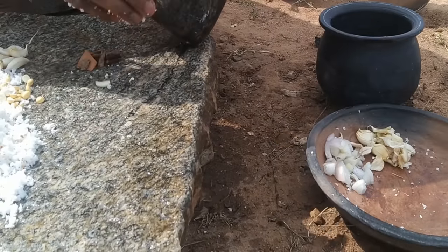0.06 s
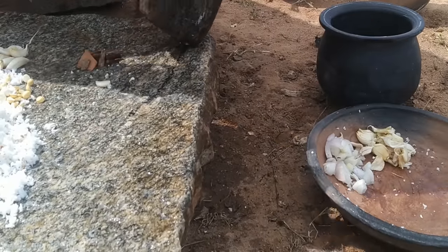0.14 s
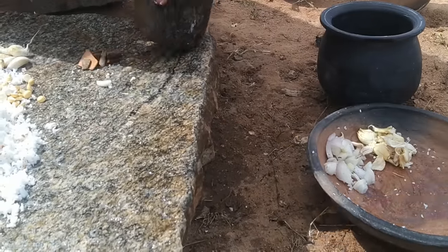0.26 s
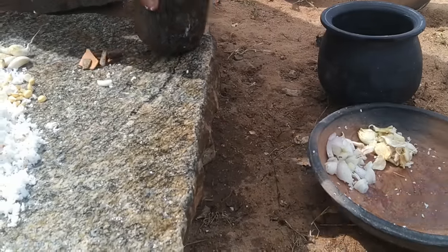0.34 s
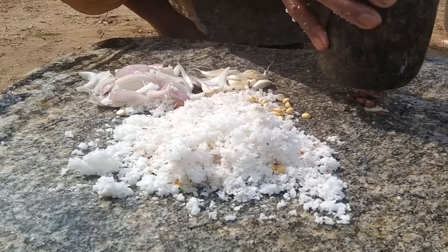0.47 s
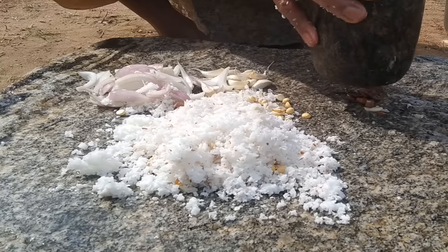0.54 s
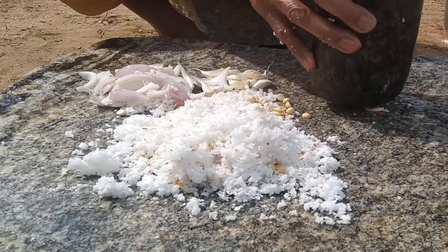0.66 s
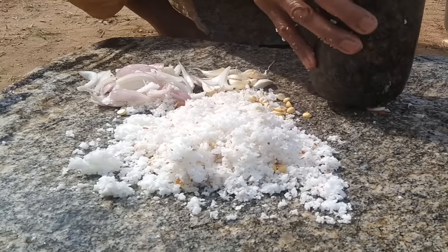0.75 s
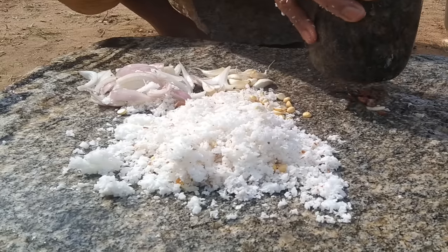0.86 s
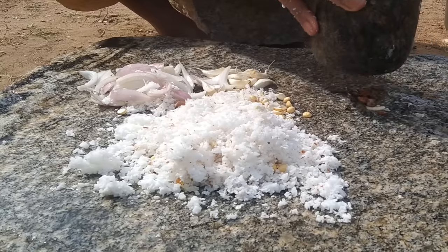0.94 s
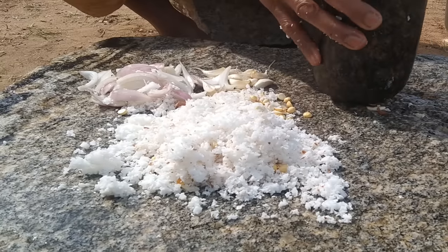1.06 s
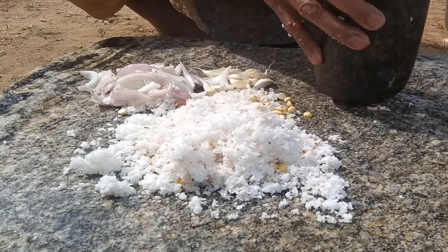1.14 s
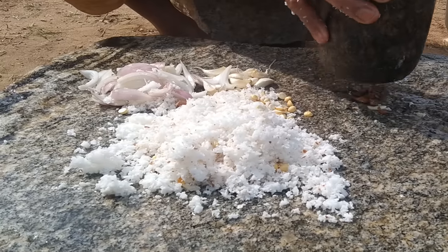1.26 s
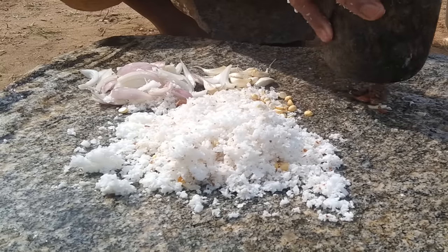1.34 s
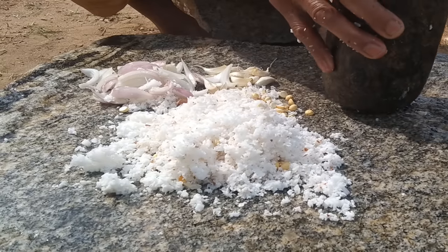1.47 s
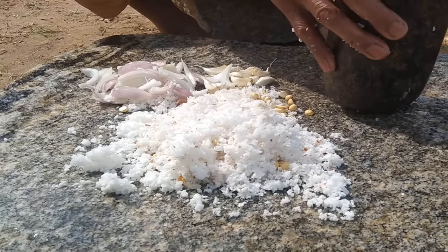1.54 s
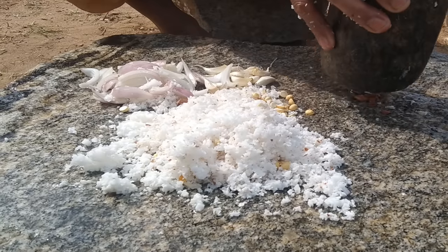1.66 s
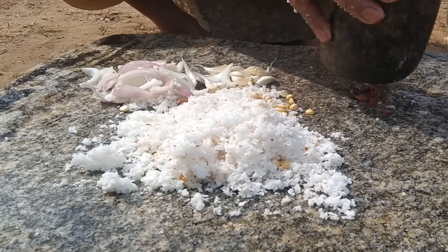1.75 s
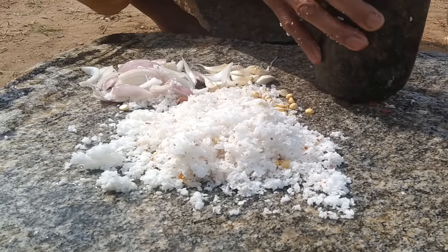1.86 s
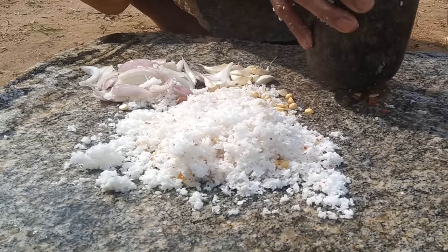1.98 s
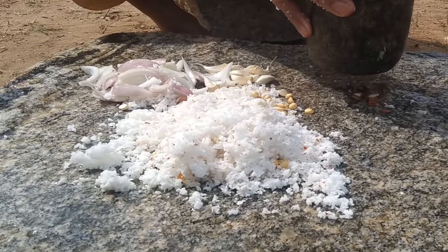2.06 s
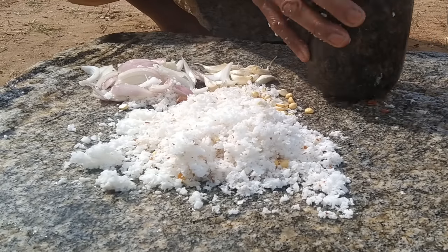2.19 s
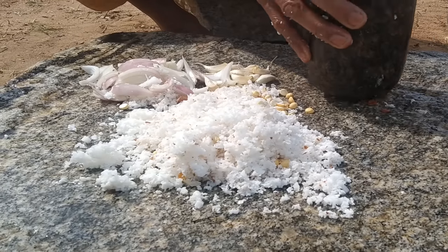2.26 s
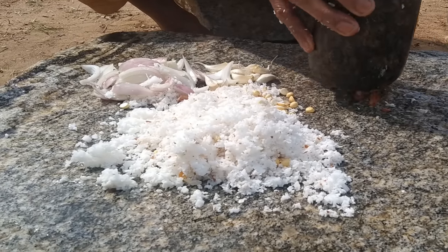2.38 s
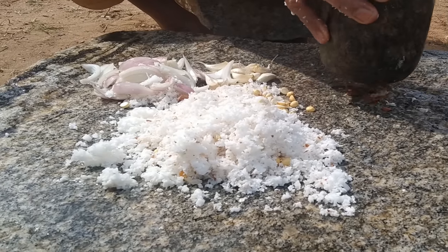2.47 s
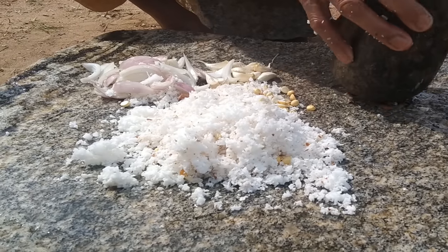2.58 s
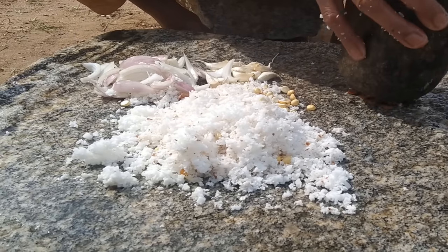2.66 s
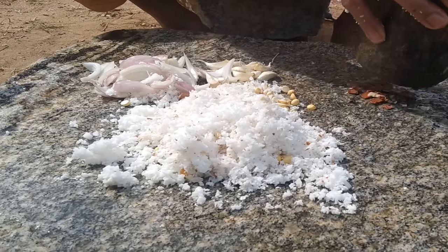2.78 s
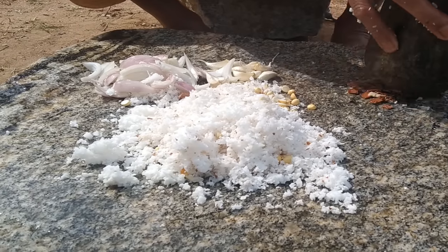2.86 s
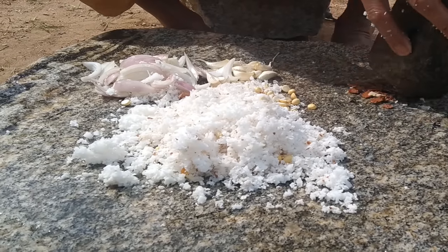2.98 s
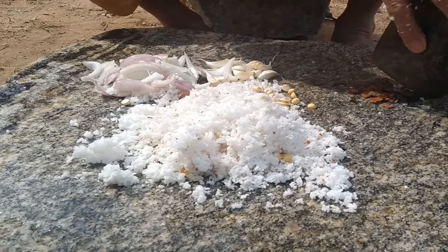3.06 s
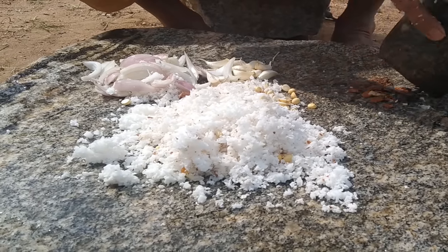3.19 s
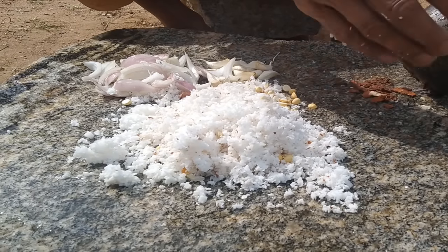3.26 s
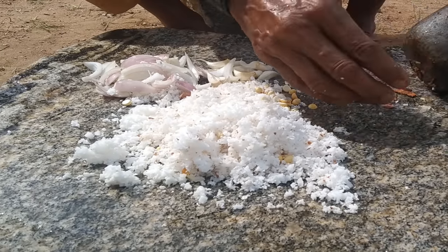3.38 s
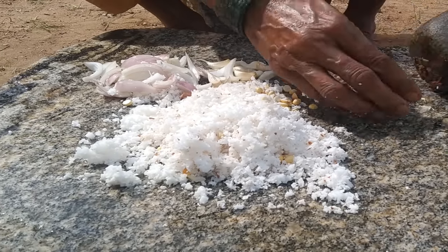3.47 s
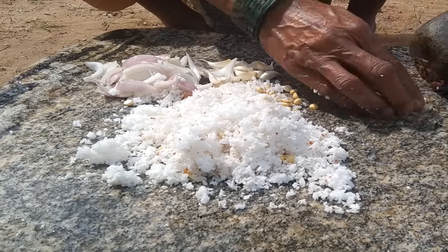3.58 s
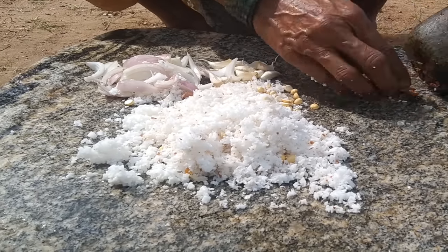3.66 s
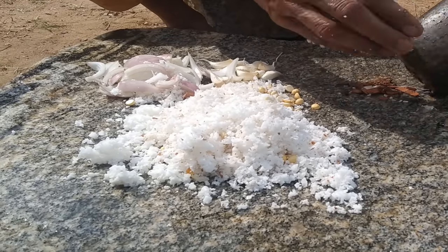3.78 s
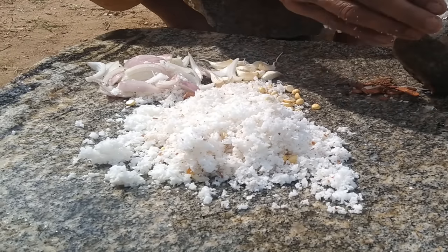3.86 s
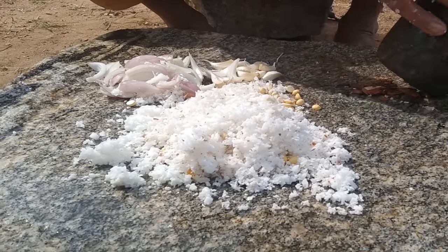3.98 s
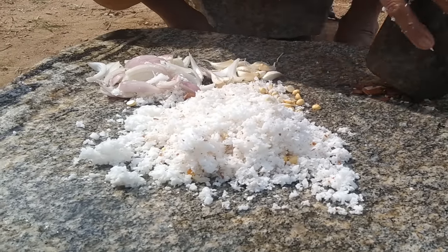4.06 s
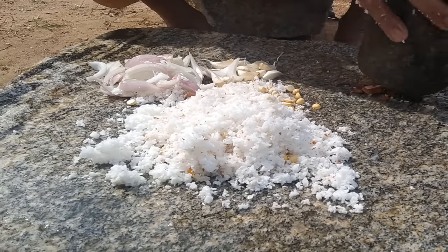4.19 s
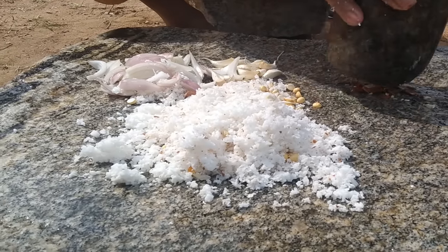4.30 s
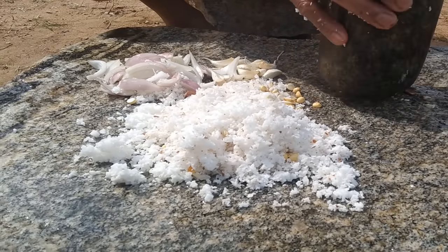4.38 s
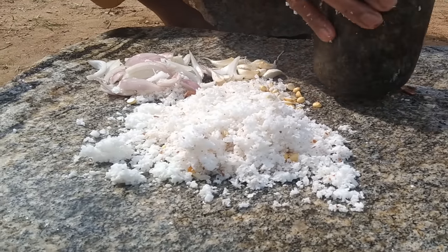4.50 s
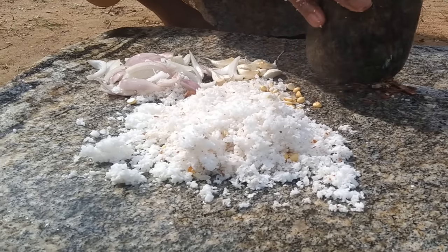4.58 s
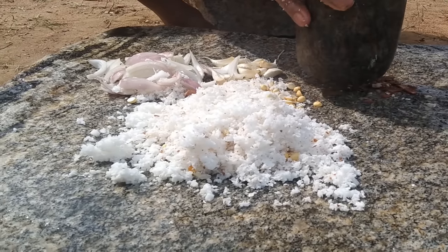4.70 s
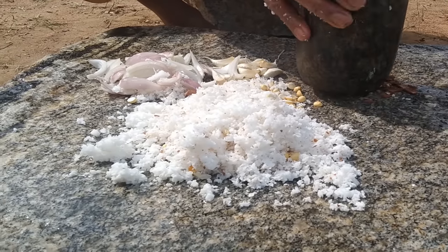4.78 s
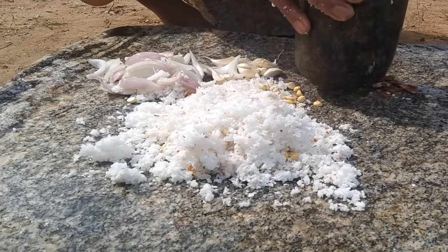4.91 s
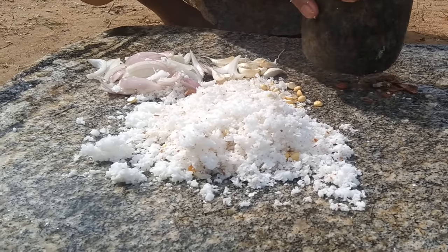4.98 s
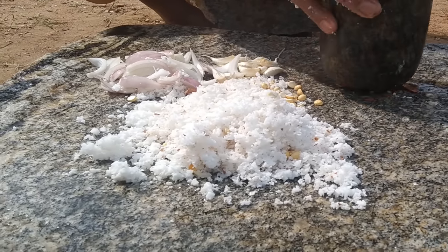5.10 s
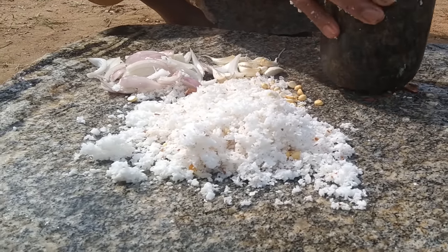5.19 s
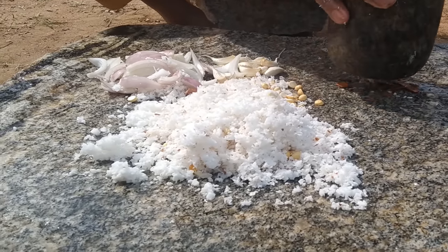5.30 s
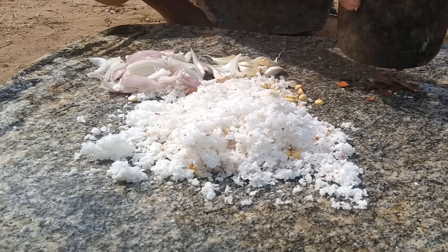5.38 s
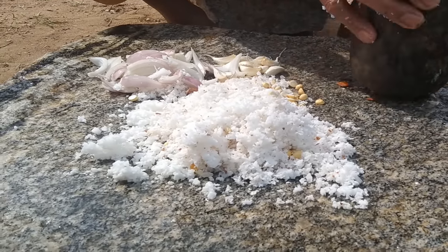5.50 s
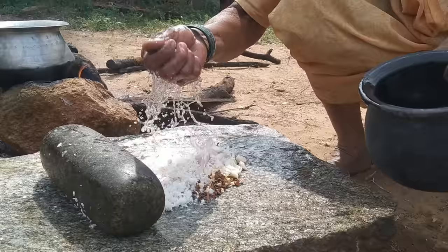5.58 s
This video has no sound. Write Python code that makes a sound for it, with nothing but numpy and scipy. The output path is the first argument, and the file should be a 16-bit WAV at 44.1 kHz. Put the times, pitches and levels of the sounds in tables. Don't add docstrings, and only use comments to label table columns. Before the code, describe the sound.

Close, heavy stone thuds and crunches on granite in two runs, split by a sharp clack and soft scraping, amid birdsong.

```python
import sys
import numpy as np
from scipy import signal
from scipy.fft import rfft, irfft
from scipy.io import wavfile
from scipy.ndimage import uniform_filter1d, map_coordinates

SR = 44100
rng = np.random.default_rng(int(sys.argv[2]) if len(sys.argv) > 2 else 0)


def natural_amplitude(level_db):
    exponent = np.asarray(level_db, float) / 20
    return 10 ** exponent


def store_pcm(level_fs):
    pcm = np.round(np.clip(level_fs, -1, 1) * 32767).astype(np.int16)
    wavfile.write(sys.argv[1], SR, np.atleast_2d(pcm).T)


N = 249058
T = np.arange(N) / SR

# start_s, thud_peak_db, thud_hz, upper_modes_db
PESTLE_BLOWS = [
    (0.6847, -17, 339, -4.5),
    (1.0744, -12.5, 374, -3.5),
    (1.4754, -15, 380, -12.5),
    (1.8667, -15, 373.5, -3),
    (2.23, -14.5, 377, -4.5),
    (2.5896, -18, 378.5, -7),
    (4.4166, -21, 341.5, -2.5),
    (4.7983, -17, 362, -1.5),
    (5.181, -28, 420, 1.5),
    (5.5548, -15.5, 370, 0),
]
# start_s, peak_db, lower_grit_db, top_grit_db
SPICE_CRUNCHES = [(0.6829, -23.5, -2, -32.5), (1.074, -29.5, -3.5, -40.5), (1.475, -26.5, -9, -31),
                  (1.8649, -22, -15.5, -29), (2.2288, -24, -1.5, -24.5), (2.589, -33, -5, -25),
                  (4.413, -23, -12, -35), (4.7948, -23, -10.5, -31.5), (5.1779, -33, -6.5, -30),
                  (5.555, -29.5, -10, -38.5)]


def unit(x):
    return x / np.sqrt(np.mean(x ** 2))


def band(x, lo_hz, hi_hz, order=2):
    sos = signal.butter(order, [lo_hz, min(hi_hz, .45 * SR)], "band", fs=SR, output="sos")
    return signal.sosfilt(sos, x)


def coloured(points, source):
    hz, db = np.transpose(points)
    f_hz = np.maximum(np.fft.rfftfreq(N, 1 / SR), 1)
    gain = natural_amplitude(np.interp(np.log(f_hz), np.log(hz), db))
    return irfft(rfft(source) * gain, N)


def walk(rate_hz):
    k = int(SR / rate_hz)
    smooth = uniform_filter1d(rng.standard_normal(N), k)
    return unit(uniform_filter1d(smooth, k))


def add(out, start_s, x):
    i = min(max(int(start_s * SR), 0), N)
    out[i:i + len(x)] += x[:N - i]


def ring(modes, contact_s, peak_db, sag=0., settle_s=1.):
    sag_s = .005
    t = np.arange(3000) / SR
    eased = t + sag * sag_s * (1 - np.exp(-t / sag_s))
    x = np.zeros(len(t))
    for k, (hz, db, t60_s) in enumerate(modes):
        x += (-1) ** k * natural_amplitude(db) * np.sin(2 * np.pi * hz * eased) * 1000. ** (-t / t60_s)
    x = x * (0.22 + 0.74 / (1 + (t / settle_s) ** 6))
    push = np.hanning(int(contact_s * SR) + 3)
    x = np.convolve(x, push)[:len(t)]
    return x * natural_amplitude(peak_db) / np.abs(x).max()


def burst(lo_hz, hi_hz, rise_s, fall_s, rms_db):
    t = np.arange(3000) / SR
    shape = (1 - np.exp(-t / rise_s)) ** 2 * np.exp(-t / fall_s)
    spray = unit(shape * band(rng.laplace(size=len(t)), lo_hz, hi_hz, order=3))
    return natural_amplitude(rms_db) * spray * np.sqrt(np.mean(shape ** 2)) / shape.max()


def knock(hz, upper_db, peak_db, contact_s, slower=1., upper_slower=1., sag=0., settle_s=1.,
          vary=.03, dull_db=0., own=()):
    # multiple_of_thud_hz, level_db, t60_s
    slab_modes = [(1, 2, 0.057), (.62, -9.5, 0.056), (1.35, -17.5, .03), (1.7, -12.5, 0.04)]
    # freq_hz, level_db, t60_s
    stone_modes = [(814, -1.5, 0.03), (996, 1.5, 0.041), (1330, -2.5, 0.04), (1810, -8, 0.039),
                   (2203, -13, 0.0054)]
    spread = rng.standard_normal((2, len(stone_modes)))
    low = [(hz * m, db, t60_s * slower) for m, db, t60_s in slab_modes]
    high = []
    for (f_hz, db, t60_s), a, b in zip(stone_modes, *spread):
        mode_db = db + upper_db - dull_db * np.log2(f_hz / 800) + 1.8 * b
        high.append((f_hz * (1 + vary * a), mode_db, t60_s * upper_slower))
    return ring(low + high + list(own), contact_s, peak_db, sag, settle_s)


def crunches():
    out = np.zeros(N)
    for s, db, lower_db, top_db in SPICE_CRUNCHES:
        add(out, s - .001, burst(5150, 7600, 0.0035, 0.0016, db - 10.0))
        add(out, s - .001, burst(2500, 6000, 0.00069, 0.0018, db + lower_db - 3.0))
        add(out, s - .001, burst(9000, 15000, .003, .0014, db + top_db + 1))
        add(out, s + 0.011, burst(4000, 7200, 0.014, 0.05, db - 41.5))
        add(out, s + 0.027, burst(11000, 12100, 0.0037, 0.0075, db - 46))
    add(out, 4.185, burst(11000, 12200, .012, .012, -74))
    return out


def blows():
    out, ground = np.zeros((2, N))
    for s, db, hz, upper_db in PESTLE_BLOWS:
        add(out, s, ring([(0.578 * hz, 0, .04)], 0.0015, db - 12.0))
        add(out, s - .001, ring([(1.27 * hz, 0, .02), (2.54 * hz, upper_db + 3, .01)], 0.00094, db - 9))
        add(out, s + 0.00196, -knock(0.889 * hz, upper_db, db + 3.5, 0.0005, slower=1.67, upper_slower=0.47,
                                     sag=0.34, settle_s=0.01))
        add(out, s + .007, ring([(.58 * hz, 0, .055), (.74 * hz, -5, .03)], .002, db - 7.5))
        add(out, s + .011, burst(179, 725, 0.00087, 0.0086, db - 15))
        add(out, s + .012, burst(620, 1500, 0.002, 0.0053, db + upper_db / 2 - 20.5))
        add(ground, s + 0.0022, burst(87, 276, 0.002, 0.017, .4 * db - 35.5))
    return out, ground


def bare_blow():
    # freq_hz, level_db, t60_s
    bare_modes = [(1017, 3.5, 0.011), (376, -8.5, 0.035), (835, -8, 0.0061), (637, -3, 0.016),
                  (2142, -13, 0.025), (1394, -8, 0.018), (2480, -13, 0.012), (3700, -12, 0.0099),
                  (202, -20, 0.07), (1700, -13, .016), (540, -11, .03)]
    start_s, peak_db = 2.9428, 3.5
    out, ground = np.zeros((2, N))
    add(out, start_s, ring(bare_modes, .0002, peak_db))
    add(out, start_s + .002, ring(bare_modes, .0004, peak_db - 5))
    add(out, start_s, burst(3800, 11000, .0002, .002, peak_db - 46.5))
    add(out, start_s + 0.0041, burst(250, 926, 0.002, .006, peak_db - 24.5))
    add(ground, start_s + 0.0046, burst(60, 230, 0.0027, 0.01, peak_db - 46.5))
    return out, ground


def rebounds():
    # start_s, peak_db, ring_hz, upper_modes_db
    landings = [(0.694, -25, 570, 4), (0.7005, -29, 540, -3), (1.097, -26.5, 840, -2),
                (1.487, -27.5, 593, -1.5), (1.887, -28.5, 760, -9.5), (2.249, -27.5, 800, -8),
                (2.255, -31, 800, -6), (2.61, -38, 507, -8), (2.9667, -23, 690, -6), (2.995, -36, 710, 1.5),
                (3.222, -45, 596, 14), (3.342, -43, 600, -5), (4.4305, -29.5, 600, -5.5),
                (4.424, -34, 620, 1), (4.819, -31, 754, -7), (5.1962, -31.5, 660, 3), (5.191, -32, 560, -6),
                (5.204, -42, 600, -8), (5.568, -27.5, 720, -3), (1.088, -29.5, 645, -0.5),
                (1.497, -34.5, 704, -2), (2.24, -32, 650, 0), (2.601, -36, 600, -1), (4.809, -30.5, 700, 2),
                (1.878, -30, 575, 1), (5.58, -37.5, 600, -5.5)]
    out = np.zeros(N)
    for s, db, hz, upper_db in landings:
        own = [(hz, 2.5, .04), (1360, upper_db / 2 - 6, .025)]
        add(out, s, knock(.6 * hz, upper_db - 5.0, db + 7.0, 0.00051, slower=0.75, upper_slower=0.57,
                          vary=.08, dull_db=7.0, own=own))
    return out


def taps_and_echoes():
    # start_s, peak_db,
    # thud_hz, upper_modes_db
    soft_taps = [(0.015, -38, 286, -13), (0.102, -40, 345, -11), (0.229, -36.5, 364, -2),
                 (0.349, -26, 325, -9.5), (0.431, -38.5, 462, -10), (0.6834, -29, 340, -4),
                 (3.016, -38.5, 357, 6), (3.126, -41, 368, 3), (3.154, -41, 347, -16),
                 (3.201, -42, 366, -4), (3.219, -31.5, 384, 0), (3.234, -39, 304, -8),
                 (3.312, -43, 310, -11), (3.351, -31.5, 368, 0), (3.362, -33.5, 346, -7.5),
                 (3.645, -49.5, 438, 3.5), (3.835, -39.5, 353, -9.5), (4.027, -45, 329, -7),
                 (4.4099, -26.5, 340, -5.5), (4.157, -44.5, 371, -26), (3.67, -47, 335, -4),
                 (4.997, -48, 437, 5.5), (4.7931, -31, 520, 0), (5.177, -36, 450, 0.5),
                 (2.586, -37, 598, -2), (2.2277, -36, 496, 0), (5.216, -43.5, 270, -15),
                 (2.268, -44, 300, -12), (1.122, -44, 280, -12), (2.979, -36, 340, -12),
                 (5.33, -52, 290, -15), (5.44, -52, 290, -5)]
    # lag_s, level_db
    wall_echoes = [
        (.075, -30),
        (.094, -38),
    ]
    echoed = [(s + lag_s, db + echo_db, hz, 2 * upper_db - 3)
              for s, db, hz, upper_db in PESTLE_BLOWS for lag_s, echo_db in wall_echoes]
    out = np.zeros(N)
    for s, db, hz, upper_db in soft_taps + echoed:
        thud = ring([(hz, 0, .065), (2.45 * hz, upper_db + 4, .03)], 0.0014, db + 2.5)
        add(out, s, band(thud, 210, 1500))
    return out


def ticks():
    # start_s, peak_db, freq_hz
    loose_ticks = [(0.571, -47, 1700), (0.7068, -42, 3910), (0.889, -56, 4050), (1.268, -51, 2300),
                   (1.096, -53, 1860), (1.7449, -40.5, 2960), (3.22, -45, 2030), (3.6026, -48.5, 6390),
                   (3.6984, -39.5, 2370), (4.0023, -46, 2318), (4.9973, -40, 3000)]
    out = np.zeros(N)
    for s, db, hz in loose_ticks + [(s - .001, db - 12, 1700) for s, db, _, _ in SPICE_CRUNCHES]:
        add(out, s, burst(0.47 * hz, 1.21 * hz, 0.0005, 0.002, db - 3.5))
    return out


def pestle():
    blow, blow_ground = blows()
    bare, bare_ground = bare_blow()
    stone = crunches() + blow + rebounds() + taps_and_echoes() + ticks() + bare
    return band(stone, 178, 15500, order=3) + blow_ground + bare_ground


def drag():
    # freq_hz, db_per_hz
    rumble_spectrum = [(100, -34), (200, -20.5), (270, -0.5), (350, 3), (480, -1.5), (750, -8),
                       (1100, -35.5)]
    rasp_spectrum = [(500, -19), (900, -2), (1250, 1), (1620, 8), (1950, 3.5), (2300, 5), (2800, -9.5),
                     (3600, -58)]
    hiss_spectrum = [(2000, -16), (3000, 4.5), (5000, -0.5), (7000, 4), (7900, -9), (8600, -36),
                     (10500, -45), (12000, -67)]
    # start_s, length_s, rasp_db, weight_db, fine_grit_db
    firm_strokes = [
        (0, 0.52, -45.5, -3.5, -7),
        (.575, 0.13, -57, -7, -14),
        (2.862, 0.062, -63.5, -0.5, -16),
        (2.99, 0.08, -48, 0.5, -33.5),
        (3.07, 0.4, -65, 1, -9),
    ]
    # start_s, length_s, rasp_db, weight_db, fine_grit_db
    light_strokes = [(.74, .13, -56, -6, -20), (1.93, 0.14, -60, -6, -18), (3.26, 0.16, -64, 12.5, -28),
                     (3.55, 0.28, -66.5, 1, 2), (3.85, 0.3, -62.5, -2.5, -13),
                     (4.18, .26, -60.5, -3.5, -11)]
    edge_s, lift_share = 0.002, .5
    slips = rng.standard_normal(N) * natural_amplitude(2.1 * rng.exponential(size=N))
    rumble = natural_amplitude(2 * walk(50)) * unit(coloured(rumble_spectrum, slips))
    rasp = natural_amplitude(1.66 * walk(70)) * unit(coloured(rasp_spectrum, slips))
    grit = unit(coloured(hiss_spectrum, slips))
    first_stroke = T < firm_strokes[0][1]
    out = natural_amplitude(-53.5) * unit(band(slips, 91, 304)) * first_stroke
    for rows, firm in (firm_strokes, True), (light_strokes, False):
        for s, length_s, db, weight_db, fine_db in rows:
            attack = (T - s) / (edge_s if firm else length_s / 2)
            release = (s + length_s - T) / (lift_share * length_s if s else edge_s)
            stroke = np.clip(np.minimum(attack, release), 0, 1)
            out += stroke * natural_amplitude(db) * (natural_amplitude(weight_db) * rumble + rasp + natural_amplitude(fine_db) * grit)
    dust = natural_amplitude(-90) * unit(band(slips, 12000, 15400, order=4)) * first_stroke
    return band(out, 40, 8700, order=4) + dust


def sing(song):
    syllables = {"fall": [(0, 1, -6), (.45, .66, 0), (1, 0, -4)], "sag": [(0, 1, -4), (.32, .37, 0),
                 (1, 0, -13)], "rise": [(0, 0, -10), (.55, .75, 0), (1, .99, -5)], "hook": [(0, .38, -8),
                 (.17, .5, 1), (.36, .8, -1), (.52, 1, -7), (.7, .85, -1), (1, 0, -6)],
                 "slide": [(0, 0, -5), (.5, .5, 0), (1, 1, -5)], "vee": [(0, .7, 0), (.45, 0, -3),
                 (1, 1, -6)], "warble": [(0, 0, -10), (.12, .45, -1), (.36, .2, -3), (.52, .55, 0),
                 (.7, .97, -5), (1, .5, -9)], "plunge": [(0, 1, -5), (.25, .42, -2), (.55, .24, -2),
                 (1, 0, -7)]}
    notes = []
    for name, rows in song.items():
        for s, length_s, a_hz, b_hz, db in rows:
            notes.append([(s + u * length_s, a_hz + v * (b_hz - a_hz), db + rel_db)
                          for u, v, rel_db in syllables[name]])
    return notes


def whistles(notes, flutter_db):
    out = np.zeros(N)
    flutter = np.tile(natural_amplitude(flutter_db * walk(69)), 2)
    waver = np.tile(1 + .006 * walk(45), 2)
    for note in notes:
        s, hz, db = np.transpose(note)
        t = np.arange(max(s[0] - .006, 0), s[-1] + .006, 1 / SR)
        i = int(t[0] * SR)
        pitch_hz = map_coordinates(hz, [np.interp(t, s, np.arange(len(s)))], order=2, mode="nearest")
        pitch_hz = pitch_hz * waver[i:][:len(t)]
        gain = uniform_filter1d(np.interp(t, s, natural_amplitude(db), 0, 0), int(.009 * SR), mode="constant")
        gain *= flutter[i:][:len(t)]
        add(out, t[0], gain * np.sin(2 * np.pi * np.cumsum(pitch_hz) / SR))
    return out


def trees(x, t60_s, onset_s, lumpy_db, ragged_db):
    t = np.arange(SR // 2) / SR
    clumps = np.repeat(rng.standard_normal(len(t) // 200 + 1), 200)[:len(t)]
    envelope = 1000. ** (-t / t60_s) * (1 - np.exp(-t / onset_s)) * natural_amplitude(lumpy_db * clumps)
    tail = rng.standard_normal((2, len(t))) * envelope
    tail = tail / np.sqrt((tail ** 2).sum(1, keepdims=True))
    foliage = np.transpose([np.geomspace(2000, 8000, num=30), ragged_db * rng.standard_normal(30)])
    return signal.fftconvolve(coloured(foliage, x)[None], tail, axes=1)[:, :N]


def birds():
    near_song = {"fall": [(0, 0.097, 4470, 6470, -54), (.195, .1, 4400, 6210, -47.5),
                 (.405, 0.11, 4470, 6370, -44.5)], "vee": [(2.14, 0.072, 2480, 1895, -59.5)],
                 "sag": [(2.535, .115, 2498, 3654, -56.5)]}
    ahead_song = {"rise": [(1.68, .03, 4850, 5050, -72), (2.97, 0.055, 3800, 5000, -64),
                  (3.235, 0.063, 3640, 4690, -63), (2.82, .048, 3650, 4550, -70),
                  (3.385, 0.057, 3730, 4900, -63), (4.105, 0.04, 3100, 3680, -68.5),
                  (4.29, .05, 2850, 3700, -71.5), (4.49, 0.065, 2950, 3500, -67),
                  (4.93, .045, 4500, 5070, -70), (5.25, 0.045, 3020, 3400, -67)],
                  "fall": [(4.8, 0.027, 2800, 3200, -70), (3.76, 0.039, 3600, 3850, -66.5)],
                  "slide": [(3.105, 0.053, 3850, 5500, -66), (1.81, .023, 3800, 5100, -74),
                  (1.835, .015, 5100, 4500, -75), (2.7, .02, 4900, 4200, -73),
                  (4.905, .03, 3700, 4300, -68), (4.715, .03, 3950, 4000, -68),
                  (2.735, .055, 3150, 4050, -72), (2.4, 0.051, 3550, 4650, -73),
                  (2.665, 0.027, 3150, 3300, -69.5), (3.145, .02, 3400, 3720, -71),
                  (4.08, 0.017, 3300, 2600, -73), (4.56, 0.013, 4000, 3400, -63),
                  (5.09, 0.04, 3650, 3200, -66), (5.13, .04, 3400, 3500, -67),
                  (5.585, 0.026, 3750, 4300, -72), (5.595, 0.059, 2980, 3000, -60.5)],
                  "vee": [(3.55, 0.08, 3630, 2900, -70), (3.89, .07, 3020, 3800, -69),
                  (4.655, 0.065, 3680, 3980, -62), (4.86, 0.056, 3590, 3800, -62.5),
                  (5.56, 0.041, 2750, 3030, -58), (2.44, .075, 3020, 3497, -72)]}
    far_song = {"fall": [(3.955, 0.027, 3850, 6870, -61)], "hook": [(4.08, 0.1, 3843, 6050, -57),
                (4.29, 0.11, 3700, 5860, -54), (4.5, 0.11, 3330, 5880, -52),
                (4.71, 0.11, 3410, 5510, -50.5)], "warble": [(4.925, .15, 2950, 4610, -52.5),
                (5.16, .15, 3090, 4490, -55)], "plunge": [(5.38, .09, 2884, 6050, -53.5)]}
    # time_s, pitch_hz, level_db
    arched_calls = [
        [(0.6, 4407, -64), (0.622, 4560, -50), (0.636, 4736, -42.5), (0.656, 6347, -52), (0.666, 6074, -47),
         (0.68, 4264, -41), (0.686, 3974, -44), (0.698, 3858, -45), (0.705, 3796, -60)],
        [(0.785, 4279, -58), (0.795, 4457, -47), (0.811, 4504, -41), (0.825, 4819, -34), (0.839, 5950, -45.5),
         (0.847, 6150, -43), (0.853, 6038, -43), (0.875, 4044, -40), (0.9, 4034, -63)],
        [(0.96, 3170, -75), (0.978, 3339, -53), (0.996, 3798, -37.5), (1.008, 3945, -34.5), (1.032, 4700, -46),
         (1.05, 4688, -44.5), (1.07, 3881, -38), (1.096, 2975, -49), (1.105, 2919, -64)],
        [(1.17, 3077, -68), (1.176, 3187, -55), (1.204, 3658, -41), (1.232, 4502, -50), (1.244, 4485, -53.5),
         (1.274, 3826, -41.5), (1.284, 3436, -51), (1.292, 3118, -44), (1.3, 2912, -56)],
        [(1.36, 2642, -80), (1.366, 2697, -66), (1.374, 2964, -48), (1.384, 3035, -46.5), (1.422, 3092, -42),
         (1.436, 2892, -47.5), (1.447, 2604, -53)],
    ]
    # time_s, pitch_hz, level_db
    flourish_notes = [
        [(1.497, 2760, -55), (1.51, 2960, -49), (1.6, 3553, -44.5), (1.615, 3830, -44.5), (1.63, 3780, -51)],
        [(1.712, 3420, -47), (1.725, 3050, -52), (1.743, 2300, -59), (1.764, 2730, -52), (1.795, 2730, -53),
         (1.82, 2600, -52.5), (1.86, 2360, -60)],
        [(1.94, 2370, -56), (1.96, 2345, -64), (1.985, 2620, -56), (2.01, 2960, -48), (2.021, 4450, -53),
         (2.033, 4560, -53), (2.05, 4400, -56), (2.061, 4680, -64)],
        [(2.28, 1910, -68), (2.32, 2460, -62), (2.38, 2754, -56), (2.435, 3590, -56)],
    ]

    def sides(left_db, right_db):
        return natural_amplitude(np.array([[left_db], [right_db]]))

    near = whistles(sing(near_song) + flourish_notes, 3.)
    ahead = whistles(sing(ahead_song), 3.5)
    far = whistles(sing(far_song), 1.5)
    near = near + natural_amplitude(-2.5) * whistles(arched_calls, 2.1)
    direct = near * sides(-4., 10.) + ahead * sides(5., 11.) + far * sides(-6., 0.)
    scattered = sides(-5., -2.5) * trees(near + ahead, 0.46, 0.0047, 2.9, 2.466)
    scattered += sides(-4.5, -1.5) * trees(far, .8, .05, 2.5, 3.5)
    scattered += sides(6., 9.5) * trees(far, 0.25, .006, 4., 1.3)
    return direct + scattered


def swells(rows, calm_db):
    gain = natural_amplitude(calm_db)
    for s, rise_s, fall_s, db in rows:
        gain = gain + natural_amplitude(db) * np.exp(-((T - s) / np.where(T < s, rise_s, fall_s)) ** 2)
    return gain


def air():
    # freq_hz, db_per_hz
    air_spectrum = [(24, -32), (60, -2.5), (150, -3), (350, 0), (750, -0.5), (1500, -2), (2300, -3),
                    (3300, -7), (6500, -10), (10500, -18), (10900, -52), (12300, -48), (13800, -40),
                    (16000, -44)]
    # freq_hz, side_minus_mid_db
    air_width = [(40, -6), (200, -11.5), (1200, -6), (4400, -6.5), (10500, 0.5), (11500, -15)]
    # time_s, level_db
    air_opening = [(0, -6), (.5, 0)]
    # peak_s, rise_s, fall_s, level_db
    low_swells = [(3.21, 0.027, .08, -50.5), (4.41, 0.056, .12, -72), (5.65, .1, .1, -72)]
    high_swells = [(.72, 0.09, 0.17, -63.5), (2.08, 0.18, 0.043, -62), (3.21, 0.027, 0.13, -66),
                   (4.41, 0.17, 0.14, -57), (5.65, 0.079, 0.12, -74)]
    wind_gusts = [(1.55, 0.048, 0.06, -69), (3.7, .1, .08, -83), (0.49, .1, .35, -58.5),
                  (1.86, 0.41, .1, -66.5), (4.9, 0.087, .1, -87)]
    width_hz, width_db = np.transpose(air_width)
    side_spectrum = [(hz, db + np.interp(np.log(hz), np.log(width_hz), width_db)) for hz, db in air_spectrum]
    mid = coloured(air_spectrum, rng.standard_normal(N))
    side = coloured(side_spectrum, rng.standard_normal(N))
    opening_db = np.interp(T, *np.transpose(air_opening))
    gain = natural_amplitude(-61.5 + opening_db + 0.8 * walk(6)) / np.std(mid)
    hiss = gain * (mid + side * np.array([[1], [-1]]))
    drone = swells(low_swells, -74) * unit(band(rng.standard_normal(N), 270, 360))
    drone += swells(high_swells, -80) * unit(band(rng.standard_normal(N), 590, 730))
    wind = np.array([unit(band(rng.standard_normal(N), 22.24, 170)) * natural_amplitude(3.0 * walk(9)) for _ in range(2)])
    return hiss + drone + wind * natural_amplitude(2.0) * swells(wind_gusts, -81.5)


def scene():
    return pestle() + drag() + birds() + air()


def low_pass(x):
    return signal.sosfilt(signal.butter(12, 15800, fs=SR, output="sos"), x)


def record(dry):
    rounded = dry / (1 + dry ** 8) ** (1 / 8)
    return low_pass(rounded)


dry = scene()
out = record(dry)
store_pcm(out)
```